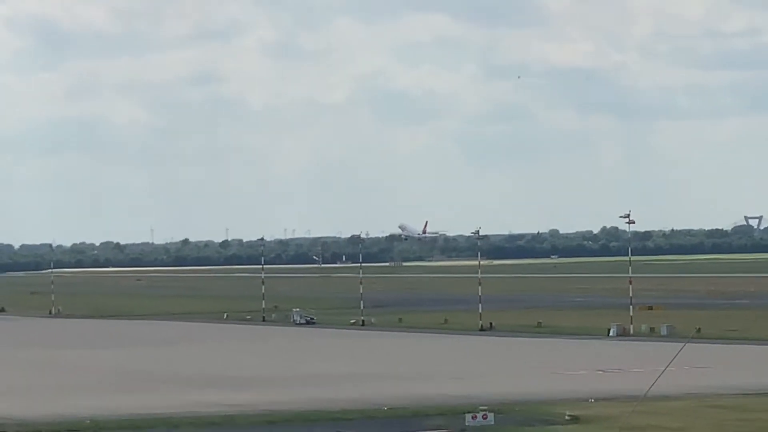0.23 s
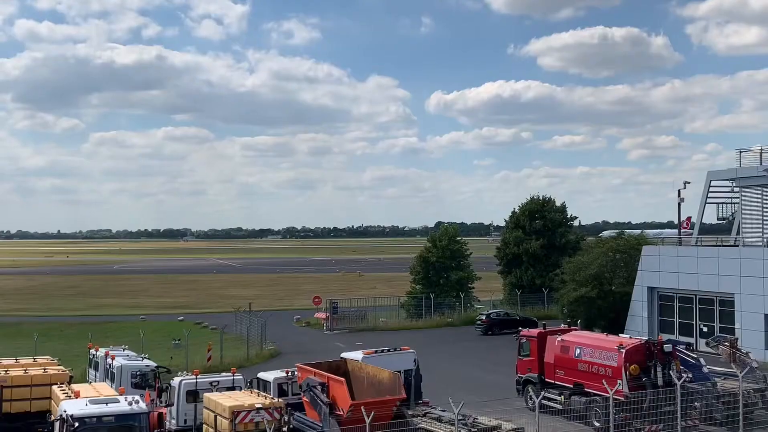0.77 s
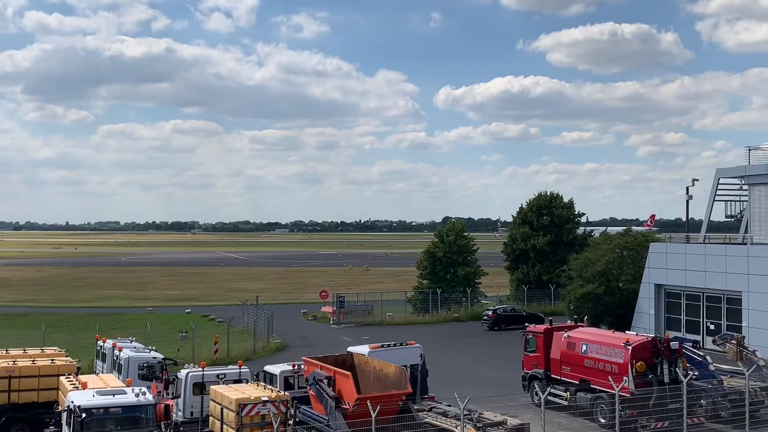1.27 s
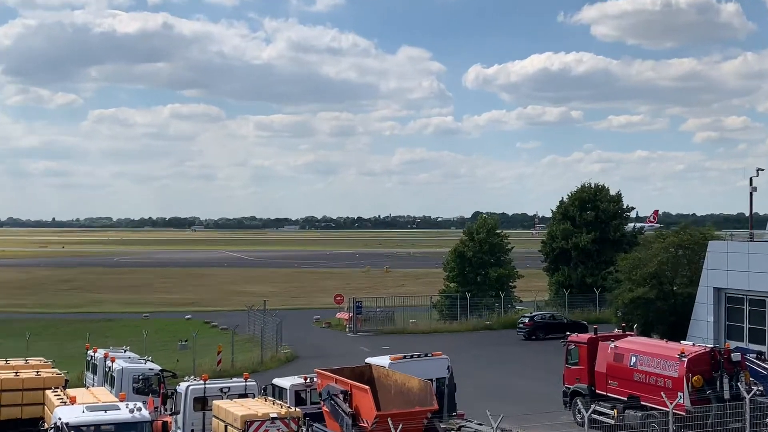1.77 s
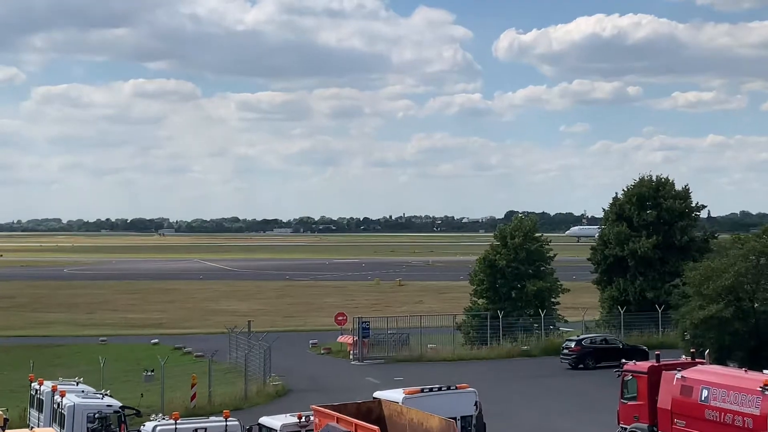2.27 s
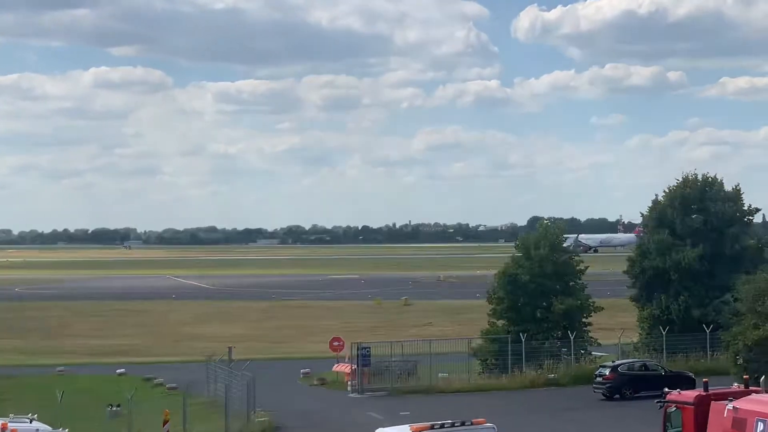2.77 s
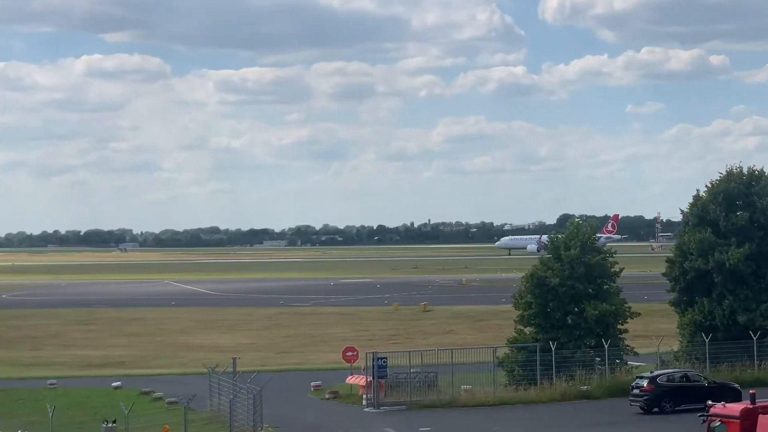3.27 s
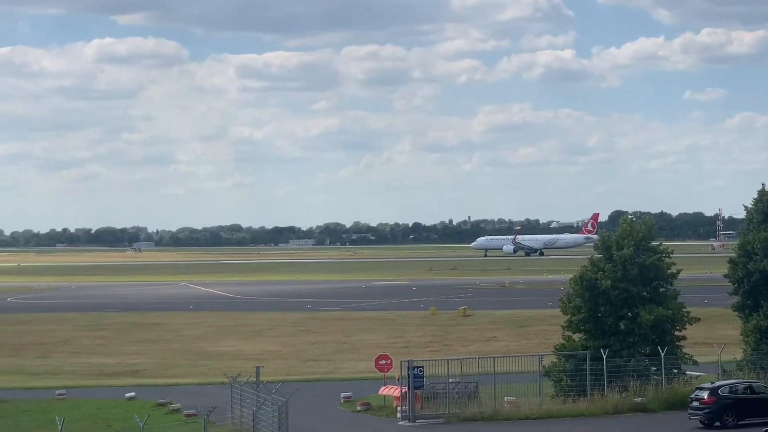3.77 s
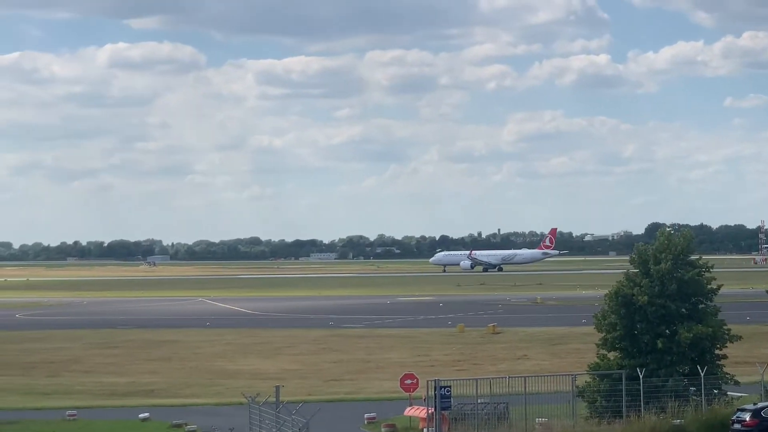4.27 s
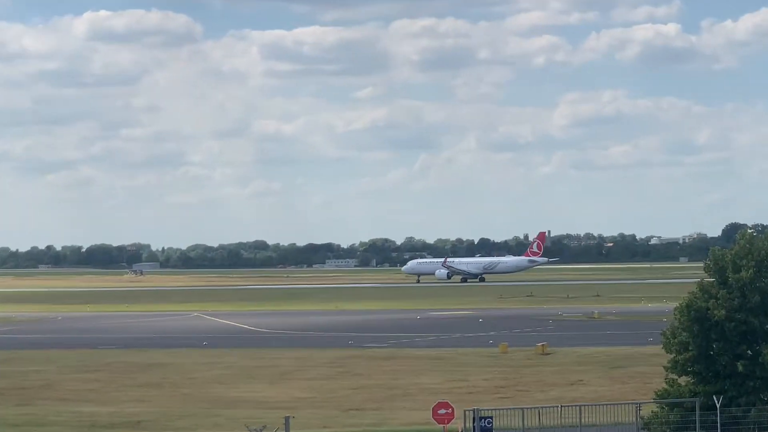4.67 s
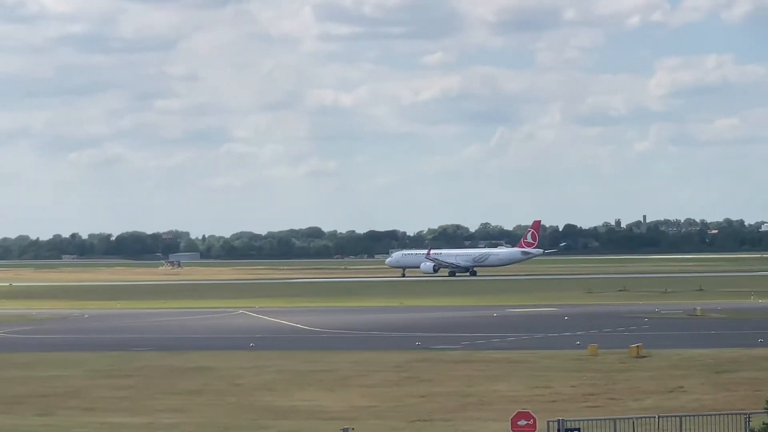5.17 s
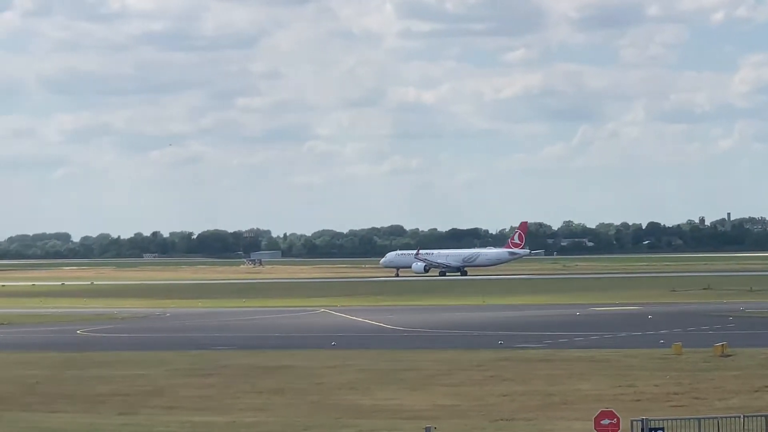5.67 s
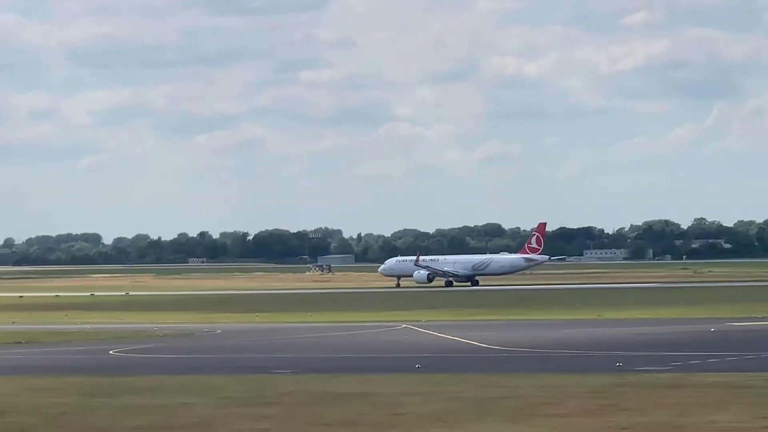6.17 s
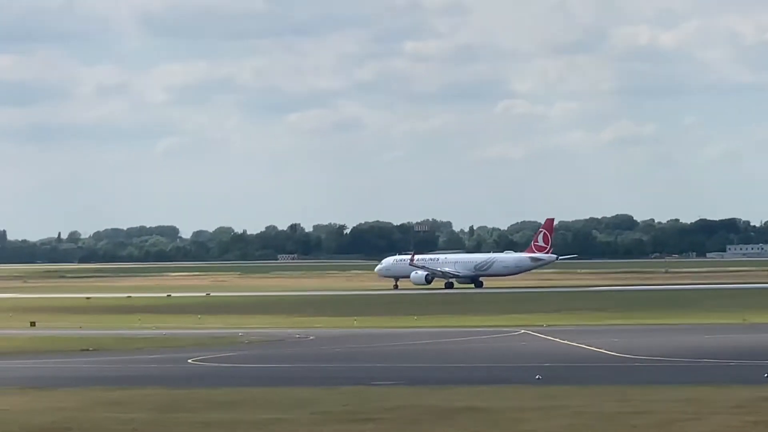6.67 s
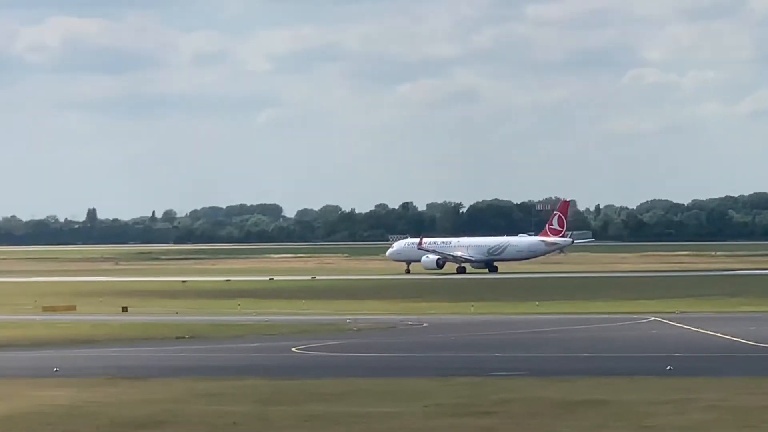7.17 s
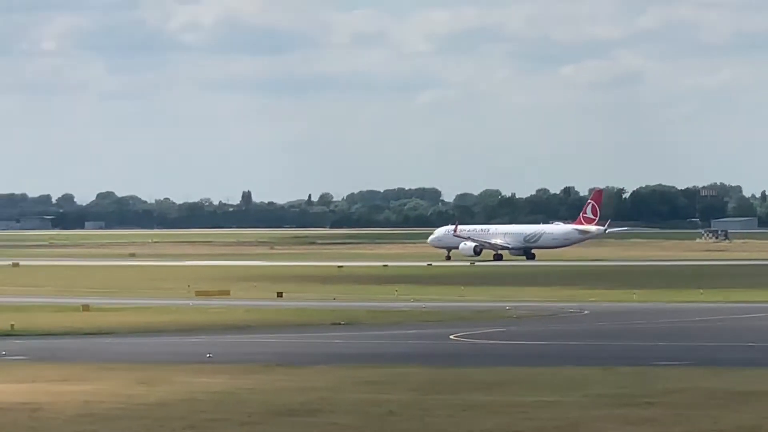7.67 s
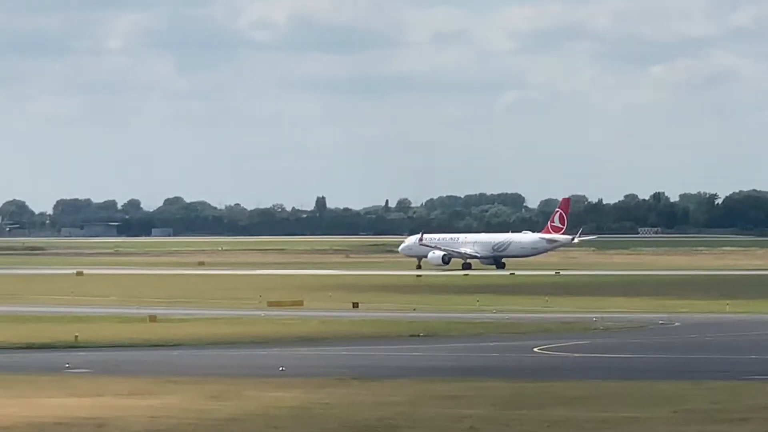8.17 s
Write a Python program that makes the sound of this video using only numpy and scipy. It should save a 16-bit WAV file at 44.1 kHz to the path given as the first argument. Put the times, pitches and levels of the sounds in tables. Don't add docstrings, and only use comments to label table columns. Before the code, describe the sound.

From 0 to 0.7 seconds a far jet climbs away: dull deep rumble, muted roar and a faint fan tone, with one tiny handling tick. It dips and stops dead; after a gap of a few milliseconds a nearer rolling airliner fades in quickly. Its bass bursts and drops irregularly over a low drone, midrange roar and soft hiss, brightest at the start. Until about 3.5 seconds, buildings add a hollow low hum. Roar swells around 2.4 seconds. From 3.5, two thin steady whines drift in and out. Between 5 and 6.3 the flickering fan tone and overtones are clearest, roar peaking near 5.9, pitch sinking gradually throughout. Afterwards the whine thins and the roar eases slightly, still rumbling when it ends at 8.4. Patchy runway echoes, open air, uneven stereo, quiet microphone hiss, faint clicks near 2.8 and 4.

```python
import sys
import numpy as np
from scipy import signal
from scipy.fft import rfft, irfft, next_fast_len
from scipy.io import wavfile
from scipy.ndimage import uniform_filter1d, map_coordinates

SR = 44100
rng = np.random.default_rng(int(sys.argv[2]) if len(sys.argv) > 2 else 0)


def transcribe(signal):
    frames = np.atleast_2d(signal).T
    limited = np.clip(frames, -1, 1)
    pcm = np.round(limited * 32767).astype(np.int16)
    wavfile.write(sys.argv[1], SR, pcm)


def invert_db(level):
    return 10 ** (np.asarray(level, dtype=float) / 20)


N = 371763
TIME = np.arange(N) / SR
COARSE = TIME[::128]
FIRST_ENDS_S, SECOND_STARTS_S, FADE_S = 0.6954, 0.7030, 0.0035
HIDDEN = np.clip((3.6 - TIME) / 0.25, 0, 1)


def unit(x):
    return x / np.sqrt(np.mean(x ** 2) + 1e-20)


def along(points, hz):
    f, v = np.transpose(points)
    return np.interp(np.log(hz + 1), np.log(f + 1), v)


def curves(rows):
    s, *columns = np.transpose(rows)
    return [np.interp(TIME, s, column) for column in columns]


def swell(s, hold_s, edge_s):
    outside_s = np.maximum(np.abs(COARSE - s) - abs(hold_s) / 2, 0)
    return np.exp(-(outside_s / edge_s) ** 2)


def swells(rows, edge_s):
    gain = sum(invert_db(db) * swell(s, hold_s, edge_s) for s, db, hold_s in rows)
    return np.interp(TIME, COARSE, gain)


def lifts(rows, edge_s):
    added_db = sum(db * swell(s, 0, edge_s) for s, db in rows)
    return np.interp(TIME, COARSE, added_db)


def wobble(rate_hz):
    coarse = TIME[::32]
    knots = rng.standard_normal(int(N * 80 / SR))
    curve = map_coordinates(knots, [coarse * min(rate_hz, 70)])
    return unit(np.interp(TIME, coarse, curve))


def turbulence(spectrum, ports, patchy_db, steady_s):
    alike, lead, lean = ports
    z = signal.stft(rng.standard_normal((2, N)), nperseg=1024)[2]
    field = uniform_filter1d(rng.standard_normal(z.shape[1:]), size=3, axis=0)
    field = uniform_filter1d(field, size=18, axis=1)
    patches = signal.istft(z * invert_db(patchy_db * unit(field)), nperseg=1024)[1][:, :N]
    m = next_fast_len(N + 8192)
    a, b = rfft(patches, m)
    hz = np.fft.rfftfreq(m, 1 / SR)
    turn = np.arccos(np.clip(along(alike, hz), 0, 1)) / 2
    lead_rad = np.interp(hz, *np.transpose(lead))
    skew = invert_db(along(lean, hz) / 2) * np.exp(0.5j * lead_rad)
    common, apart = a * np.cos(turn), b * np.sin(turn)
    sides = [(common + apart) * skew, (common - apart) / skew]
    pair = irfft(invert_db(along(spectrum, hz)) * sides, m)[:, :N]
    power = np.abs(uniform_filter1d(pair.mean(0) ** 2, int(steady_s * SR)))
    return pair / np.sqrt(power + 1e-20)


def tone(hz, flutter_db, lead_rad, lean_db):
    cycle = 2 * np.pi * np.cumsum(hz + 0 * TIME) / SR + 0.62 * wobble(16)
    shimmer = invert_db(flutter_db * (wobble(16) + 0.7 * np.array([wobble(6), wobble(6)])))
    side = np.array([[0.5], [-0.5]])
    return unit(shimmer * np.sin(cycle + side * lead_rad)) * invert_db(side * lean_db)


# pitch_hz, density_db
SELF_NOISE = [(5000, -24.5), (7000, 0), (9000, -7), (10600, -9.5), (11000, -6), (11400, -9), (12400, -15.5),
              (14500, -12), (15100, -20), (15200, -76.5)]
# pitch_hz, likeness_0_to_1
HISS_ALIKE = [(7000, 0), (8400, .1), (8800, 1), (10000, 1), (10400, .1), (11300, 0), (11420, 1), (12350, 1),
              (12450, 0), (13000, .1), (13150, 1)]
HISS_LEAD = [(0, 0), (11350, 0), (11400, np.pi), (12380, np.pi), (12420, 0)]


def self_noise():
    ports = HISS_ALIKE, HISS_LEAD, [(1, 0.0014)]
    return invert_db(-80.5) * turbulence(SELF_NOISE, ports, patchy_db=3.5, steady_s=0.4)


# centre_s, level_db, pitch_hz
TICKS = [(.033, -59, 10600), (2.72, -68, 7600), (2.735, -67, 8600), (2.75, -66, 8000), (2.77, -69, 7800),
         (2.86, -69, 8200), (3.963, -59, 7200), (3.967, -62, 8600), (7.16, -70, 14000)]


def ticks():
    def click(s, db, hz):
        return invert_db(db) * np.exp(-((TIME - s) / 0.0005) ** 2) * np.sin(2 * np.pi * hz * TIME)
    return sum(click(*row) for row in TICKS)


# start_s, rumble_db, roar_db
FAR = [(0.0, -33.5, -41.5), (0.032, -32.5, -41.5), (0.524, -32, -42.5), (0.646, -29, -43),
       (0.652, -35, -39.5), (0.68, -26, -42)]
# pitch_hz, density_db
FAR_RUMBLE = [(12, -44), (20, -14.5), (70, -1.5), (86, -11), (113, -18), (161, -13), (216, -22),
              (300, -25.5), (390, -58), (660, -120)]
# pitch_hz, density_db
FAR_ROAR = [(200, -24), (300, -8.5), (370, -3.5), (450, -9), (560, -9), (740, -8.5), (1020, -11),
            (1300, -10), (1600, -14.5), (1850, -17), (2500, -23.5), (4000, -33), (5500, -43.5), (7000, -50),
            (11000, -100)]
# pitch_hz, likeness_0_to_1
FAR_ALIKE = [(60, 1), (200, 1), (280, 0.93), (400, 0.7), (700, 0.44), (1000, 0.84), (1600, 0.67),
             (2000, 0.47), (5000, 0.13)]
# pitch_hz, left_lead_rad
FAR_LEAD = [(0, -.3), (200, 0), (300, 1), (450, 1.9), (620, 3.1), (760, 5.6), (1000, 7.8), (1300, 9),
            (1600, 9), (2000, 10), (3000, 10.5), (4000, 12.5)]
# pitch_hz, left_minus_right_db
FAR_LEAN = [(60, -0.5), (97, -8), (160, -4.5), (260, -7.5), (410, -0.5), (670, 7.5), (1090, -3.5),
            (1770, 2.5), (2870, -2), (4650, -1.5)]


def climbing_jet():
    rumble_db, roar_db = curves(FAR)
    ports = FAR_ALIKE, FAR_LEAD, FAR_LEAN
    rumble = invert_db(rumble_db) * turbulence(FAR_RUMBLE, ports, patchy_db=2.0, steady_s=0.13)
    roar = invert_db(roar_db) * turbulence(FAR_ROAR, ports, patchy_db=1.5, steady_s=0.17)
    fan_tone = invert_db(-50.0) * tone(735, 2.7, 1.0, 6)
    return rumble + roar + fan_tone


WHINE_HZ = (2663.5, 2911)
# centre_s, level_db, hold_s
WHINES = [
    [(3.52, -59, .06), (3.68, -52, 0.027), (3.92, -57.5, 0.22), (4.1, -61, .05), (4.22, -58.5, .05),
     (4.34, -53, .03), (5.05, -63, .1), (5.38, -56, .05), (5.72, -56, 0.18), (5.98, -57.5, 0.19),
     (6.35, -52, .08), (6.52, -58, .06), (7.75, -60, .02), (8.2, -55.5, 0.062)],
    [(3.55, -54.5, .1), (3.84, -57, 0.22), (4.08, -60, .08), (4.38, -58, .04), (4.95, -61, 0.26),
     (5.52, -56, .1), (5.73, -59, .02), (5.83, -58, .02), (5.96, -58, .03), (6.42, -58, .04),
     (6.58, -60, .05), (7.8, -61, .03), (7.93, -53, .05), (8.16, -61, .04), (8.27, -52, 0.094)],
]


def whines():
    pairs = zip(WHINES, WHINE_HZ)
    return sum(invert_db(-0.5) * swells(rows, 0.044) * tone(hz, 1.3, 0.4, 0.2) for rows, hz in pairs)


# pitch_hz, likeness_0_to_1
ALIKE = [(60, .997), (200, .98), (280, .68), (350, .3), (640, .72), (900, .4), (1200, .35), (1700, .58),
         (2400, .48), (5000, .2), (8000, .1), (11000, .3)]
# pitch_hz, left_lead_rad
LEAD = [(0, 0), (260, -0.4), (600, 3.2), (950, 1.4), (1460, 4.9), (1720, 6.3), (2240, 4.4), (2670, 5.5),
        (2930, 7.0), (3190, 6.6), (3790, 11.7), (4050, 12.5), (4390, 11.2), (4820, 11.8)]
# pitch_hz, left_minus_right_db
LEAN = [(60, -1), (97, -4.5), (160, -3), (260, -8), (410, -3.5), (670, 3), (1090, -0.5), (1770, 0.5),
        (2870, -0.5), (4650, -1.5)]


def near_noise(spectrum, patchy_db, steady_s):
    return turbulence(spectrum, (ALIKE, LEAD, LEAN), patchy_db, steady_s)


def bands(rows):
    steps = np.linspace(-5.5, 5.5, num=23)
    bells = [np.transpose([hz + half_width_hz * steps, -4.34 * steps ** 2]) for hz, half_width_hz in rows]
    return [near_noise(bell, patchy_db=3.5, steady_s=0.11) for bell in bells]


# pitch_hz, half_width_hz
HUM_BANDS = [(198, 13), (365, 38), (440, 14), (555, 14)]
# centre_s, level_db, hold_s
HUM = [
    [(1.05, -29.5, 0.35), (1.83, -31, 0.36), (2.27, -32.5, 0.33), (2.85, -30.5, 0.19)],
    [(.84, -51.5, 0.027), (1.95, -35.5, 0.62), (2.4, -38.5, 0.11)],
    [(1.2, -62, 0.28), (1.76, -41, .06), (2.0, -42, 0.28), (2.38, -50, .02), (2.72, -42, .04),
     (3.25, -50, 0.16)],
    [(1.73, -51, .02), (2.13, -49, .02), (2.38, -44, .04), (2.95, -48, 0.59), (3.52, -61, 0.016)],
]
HUM_REST_DB = (-40, -43.5, -54, -66)


def hums():
    levels = [np.hypot(invert_db(rest_db), swells(rows, 0.034)) for rows, rest_db in zip(HUM, HUM_REST_DB)]
    return HIDDEN * invert_db(-1.5) * sum(level * noise for level, noise in zip(levels, bands(HUM_BANDS)))


# pitch_hz, half_width_hz
EXHAUST_BANDS = [(152, 16), (1520, 110), (2680, 150), (2100, 130), (6650, 260), (960, 80), (270, 25),
                 (5150, 160)]
# centre_s, level_db, hold_s
EXHAUST_SWELLS = [
    [(.92, -33.5, 0.074), (1.35, -34.5, 0.08), (2.6, -31.5, 0.088), (2.9, -31.5, 0.09), (3.4, -38.5, 0.089),
     (3.72, -30.5, 0.068), (4.0, -30.5, 0.035), (4.9, -40, 0.11), (5.35, -37, .04), (5.6, -34, 0.079),
     (5.75, -32.5, 0.14), (6.0, -34.5, 0.045), (7.65, -34.5, 0.056), (7.92, -37, 0.11)],
    [(1.7, -55, .12), (2.35, -49, 0.31), (2.68, -47, 0.15), (2.98, -48, 0.24), (3.58, -50, .06),
     (3.8, -51, 0.055), (4.95, -51.5, 0.13), (5.58, -51, .05), (6.2, -53, .08), (6.7, -55, 0.43)],
    [(4.45, -66, .2), (5.0, -53.5, 0.69), (3.5, -53, .06), (3.68, -60, 0.052), (5.6, -53, 0.24),
     (6.1, -50, 0.36), (6.9, -57.5, 0.33), (7.25, -59, 0.12), (7.68, -55.5, 0.17), (8.0, -59, .06)],
    [(1.45, -52, .15), (1.8, -55, 0.16), (2.35, -54, 0.44), (2.95, -58, 0.17), (5.8, -58, .3),
     (6.15, -58, .1), (6.9, -61, .3), (7.3, -59.5, .2)],
    [(.9, -82, 0.32), (2.3, -87, .4), (4.5, -78.5, 0.65), (6.05, -89, .2), (6.5, -87, .3), (6.9, -84, .3),
     (7.2, -82, .2), (7.5, -80, .3), (7.85, -79, .3), (8.25, -77.5, 0.3)],
    [(1.35, -48.5, 0.078), (2.3, -55, .1), (2.65, -47, 0.27), (3.02, -50, 0.14), (3.3, -53.5, .04),
     (4.22, -49.5, .06), (4.95, -54, 0.09), (5.65, -49.5, 0.066), (7.65, -49.5, 0.22)],
    [(1.08, -41.5, 0.25), (2.9, -45.5, 0.25), (3.5, -40, 0.22), (4.3, -45.5, 0.11), (6.2, -45, 0.32)],
    [(1.0, -72, .4), (2.3, -76.5, .3), (3.53, -73, 0.092), (4.5, -76.5, 0.97), (5.6, -75, .6),
     (7.3, -79, 0.43)],
]


def exhaust_bands():
    return sum(swells(rows, 0.054) * noise for rows, noise in zip(EXHAUST_SWELLS, bands(EXHAUST_BANDS)))


# start_s, roar_db
THRUST = [(0.71, -42.5), (1.3, -42.5), (1.62, -40), (1.93, -40), (2.08, -41), (2.37, -37), (2.54, -42),
          (2.88, -39), (3.25, -41), (3.8, -41), (4.7, -41.5), (5.1, -41), (5.45, -40.5), (5.85, -38.5),
          (6.58, -42.5), (7.35, -43.5), (7.7, -41.5), (8.43, -44)]


def thrust():
    roar_db, = curves(THRUST)
    return roar_db, roar_db - roar_db.mean()


# start_s, pitch_hz
FAN_HZ = [(0.7, 925.5), (2, 905.0), (3.3, 890.5), (4.6, 872.0), (5.9, 861.0), (7.1, 850.5), (8.43, 838.5)]


def fan_pitch():
    return curves(FAN_HZ)[0]


SKIRT_DB = (-59.5, -56, -65.5)


def skirts():
    cycle = 2 * np.pi * np.cumsum(fan_pitch()) / SR
    swing_db = thrust()[1]
    common, apart = wobble(70), 0.8 * wobble(70)
    blur = np.array([common + apart, common - apart])
    orders = sum(invert_db(db) * np.sin(k * cycle) for k, db in enumerate(SKIRT_DB, start=1))
    fade_db = 12 * np.clip(TIME - 6.25, 0, 0.5)
    return invert_db(1.5 * swing_db - fade_db) * blur * orders


# centre_s, level_db, hold_s
FAN = [
    [(.85, -49, .03), (1.2, -49, 0.15), (1.45, -43, 0.018), (1.62, -48.5, .1), (1.8, -52, .04),
     (2.3, -48, .02), (2.6, -51.5, .12), (2.85, -50, .1), (3.5, -52.5, 0.49), (4.25, -50, .03),
     (4.93, -47, 0.086), (5.05, -49, .02), (5.27, -46, .02), (5.62, -46.5, 0.089), (5.9, -46, 0.065),
     (6.08, -45.5, 0.082), (6.2, -55, .04), (7.55, -49, .04), (7.74, -47.5, 0.13)],
    [(2.35, -55, 0.044), (2.7, -45, 0.028), (3.0, -54.5, .05), (3.13, -53, 0.018), (3.33, -48.5, .02),
     (3.75, -57, 0.47), (4.25, -56, .02), (4.7, -59, 0.14), (5.05, -54, .12), (5.22, -53, .04),
     (5.3, -49.5, 0.047), (5.4, -52, .04), (5.47, -53, 0.045), (5.55, -49.5, .03), (5.73, -48.5, 0.028),
     (5.81, -44.5, 0.027), (5.64, -56, .02), (5.97, -54, .02), (6.08, -50.5, 0.054), (6.2, -44, 0.072),
     (6.41, -51, 0.06), (6.63, -46.5, .01), (6.87, -51.5, 0.044), (6.99, -55, .03), (7.28, -57, .02),
     (7.53, -55, 0.059)],
    [(2.2, -58, .03), (2.43, -53, .06), (3.58, -62, 0.41), (4.42, -56, .05), (4.83, -62, .12),
     (5.22, -59, .15), (5.6, -54, .05), (5.75, -56, .03), (5.97, -55, 0.055), (6.1, -54.5, .04),
     (6.19, -54.5, .02), (6.55, -62, .03), (6.7, -58, .03), (6.9, -60, .05), (7.62, -54, .05),
     (7.72, -60, .03), (7.98, -56, .03)],
    [(2.22, -73, 0.018), (5.1, -82, 0.34), (5.62, -78.5, 0.3), (6.03, -64, 0.046)],
]
# start_s, level_db
BEARING = [(3.9, -100), (4.5, -86), (5.3, -84), (5.9, -90), (6.6, -100)]


def fan():
    pitch_hz = fan_pitch()
    leads_rad, leans_db = (2.5, 0.5, 1.2, 4.5), (-12.5, -0.5, -3.0, 6.5)
    trims_db, floors_db = (-1.0, 1.0, 0.0, 9.5), (-68.5, -74.0, -77.0, -67.5)
    total = invert_db(curves(BEARING)[0]) * tone(6828, 1.5, 0.4, 0.3)
    orders = zip(FAN, leads_rad, leans_db, trims_db, floors_db)
    for k, (rows, lead_rad, lean_db, trim_db, floor_db) in enumerate(orders, start=1):
        level = invert_db(trim_db) * swells(rows, 0.032) + invert_db(floor_db)
        total = total + level * tone(pitch_hz * k, 0.98, lead_rad, lean_db)
    return total


# pitch_hz, density_db
EDDIES = [(16, -37), (28, -14.5), (49, -5.5), (70, -3), (92, -4), (135, -16.5), (180, -29), (300, -120)]
# pitch_hz, density_db
DRONE = [(79, -21), (135, -6.5), (194, -2.5), (275, -10), (360, -11), (406, -14.5), (520, -19), (680, -54),
         (1140, -120)]
# pitch_hz, density_db
ROAR = [(310, -21), (520, 0), (656, 0.5), (887, -1), (1290, -5), (1520, -8.5), (1740, -7), (1890, -9),
        (2380, -12), (2660, -14), (3300, -14), (4290, -38.5), (7260, -120)]
# pitch_hz, density_db
HISS = [(2200, -34.5), (3300, -3), (3900, 1.5), (4500, -4.5), (5100, -9.5), (5700, -14.5), (6800, -17.5),
        (7500, -26.5), (9000, -42.5), (11000, -120)]
# peak_s, added_db
SURGES = [(.883, 4.5), (1.036, 7.5), (1.105, 9), (1.167, 5.5), (1.43, 5.5), (1.771, 7), (1.832, 5),
          (1.953, 5), (2.163, 7.5), (2.281, 3.5), (2.447, 4), (2.505, 7.5), (2.734, 4), (2.828, 6),
          (2.883, 5.5), (2.958, 4.5), (3.148, 8.5), (3.358, 3.5), (3.67, 3), (3.746, 6), (3.813, 3.5),
          (3.957, 3.5), (4.134, 7), (4.215, 1), (4.285, 4.5), (4.367, 4.5), (4.489, 8), (4.648, 2.5),
          (4.767, 5), (4.811, 5.5), (4.892, 6), (4.972, 9.5), (5.079, 4.5), (5.159, 7.5), (5.306, 3),
          (5.404, 9.5), (5.462, 6.5), (5.566, 9), (5.642, 9), (5.713, 3), (5.987, 4.5), (6.178, 5.5),
          (6.3, 1), (6.45, 4), (6.593, 5), (6.751, 4), (6.947, 5), (7.203, 4), (7.253, 3.5), (7.314, 3.5),
          (7.494, 5), (7.567, 3), (7.741, 4.5), (7.797, 7.5), (7.932, 6), (8.029, 4.5), (8.27, 3),
          (8.317, 6.5)]
# centre_s, added_db
LULLS = [(.771, -1), (.837, -2), (1.078, -7), (1.136, -6), (1.23, -8), (1.27, -7), (1.309, -9), (1.349, -2),
         (1.459, -12), (1.507, -11), (1.792, -5), (1.93, -7), (1.989, -5), (2.061, -1), (2.122, -5),
         (2.394, -12), (2.535, -8), (2.617, -8.5), (2.775, -5), (2.851, -10), (3.052, -3), (3.115, -4),
         (3.405, -5), (3.483, -2), (3.532, -8.5), (4.161, -8), (4.255, -8), (4.432, -2), (4.52, -16),
         (4.555, -6), (4.608, -3), (4.741, -7), (4.839, -11), (5.04, -3.5), (5.211, -5), (5.373, -3),
         (5.512, -5.5), (5.605, -9), (5.876, -5), (6.037, -9), (6.074, -3), (6.129, -9), (6.35, -5),
         (6.494, -10), (6.693, -2), (6.812, -8), (6.923, -9), (6.976, -15), (7.053, 0.5), (7.101, -4),
         (7.341, -1), (7.443, -4.5), (7.642, -10), (7.711, -14), (7.768, -5), (7.824, -3), (8.057, -6),
         (8.151, -6), (8.349, -9), (8.42, -8)]
# peak_s, added_db
DRONE_SURGES = [(.73, 4), (1.1, 0.5), (2.88, 3), (4.3, 0.5), (5.7, 0.5), (7.6, 2)]
# peak_s, added_db
PUFFS = [(1.25, 1), (1.78, 1.5), (1.93, 1.5), (2.37, -1.5), (3.53, 1.5), (4.24, 1), (4.82, 1), (5.44, 1),
         (6.04, 2), (6.09, 1)]


def rolling_jet():
    roar_db, swing_db = thrust()
    beam_db = lifts([(4.2, 1.5)], 1.4)
    rumble_db = -25.5 + beam_db + lifts(SURGES, 0.015) + lifts(LULLS, 0.013)
    drone_db = -34 + 0.89 * swing_db + 1 * HIDDEN + 1.0 * wobble(7) + lifts(DRONE_SURGES, 0.039)
    puff_db = lifts(PUFFS, 0.04)
    early_db = 8 * np.exp(-np.abs(TIME - SECOND_STARTS_S) / 0.89)
    hiss_db = -60.5 + 0.93 * swing_db + early_db + puff_db
    gust = wobble(11)
    rumble = invert_db(rumble_db + 0.23 * wobble(26)) * near_noise(EDDIES, patchy_db=0.0, steady_s=0.032)
    drone = invert_db(drone_db) * near_noise(DRONE, patchy_db=0.96, steady_s=0.14)
    roar = invert_db(roar_db + 0.76 * gust + 0.17 * puff_db) * near_noise(ROAR, patchy_db=1.8, steady_s=0.15)
    hiss = invert_db(hiss_db + 0.21 * gust) * near_noise(HISS, patchy_db=1.2, steady_s=0.5)
    return rumble + drone + roar + hiss


def microphone(sound):
    cavity_hz, width_hz, added_gain = 358, 30, 0.8
    highpass = signal.butter(4, 38, "highpass", fs=SR, output="sos")
    left, right = signal.sosfilt(highpass, sound)
    ring = signal.lfilter(*signal.iirpeak(cavity_hz, cavity_hz / width_hz, SR), right)
    return np.array([left, right + added_gain * ring])


def scene():
    hiss = self_noise()
    first = microphone(climbing_jet() + ticks() + hiss)
    near = hums() + exhaust_bands() + whines() + skirts() + fan() + rolling_jet()
    second = microphone(near + ticks() + hiss)
    stop = np.clip(0.22 + (FIRST_ENDS_S - TIME) / FADE_S, 0, 1) * (TIME < FIRST_ENDS_S)
    fade_in = np.clip((TIME - SECOND_STARTS_S) / FADE_S, 0, 1) ** 2
    return first * stop + second * fade_in


def band_limit(x):
    return signal.sosfilt(signal.butter(12, 15140, fs=SR, output="sos"), x)


def record(dry):
    return band_limit(dry)


dry = scene()
out = record(dry)
transcribe(out)
```